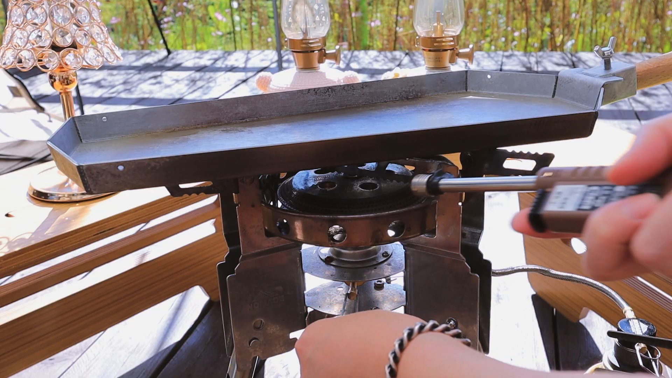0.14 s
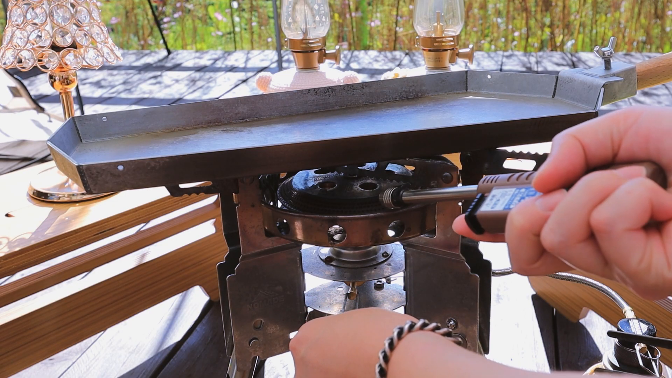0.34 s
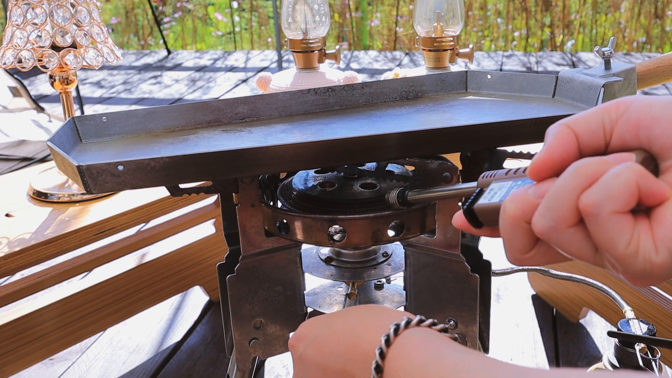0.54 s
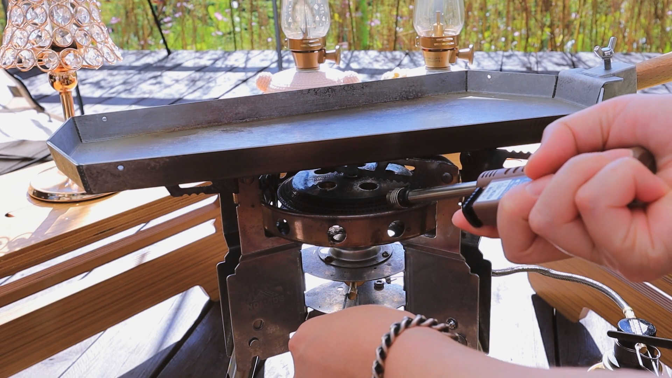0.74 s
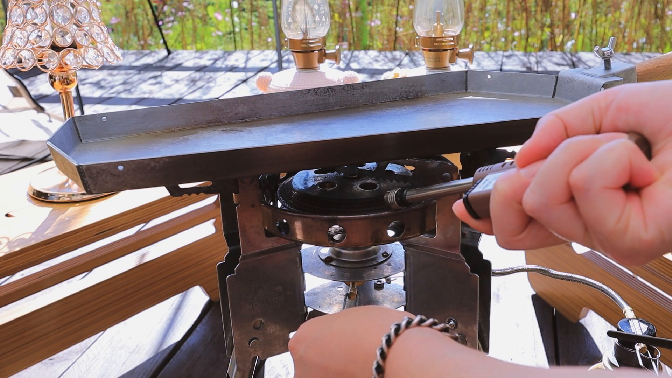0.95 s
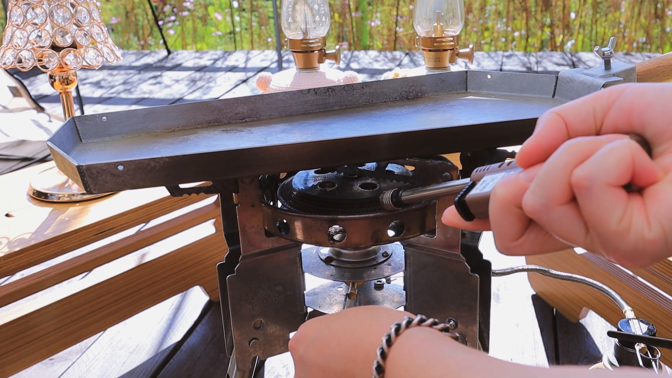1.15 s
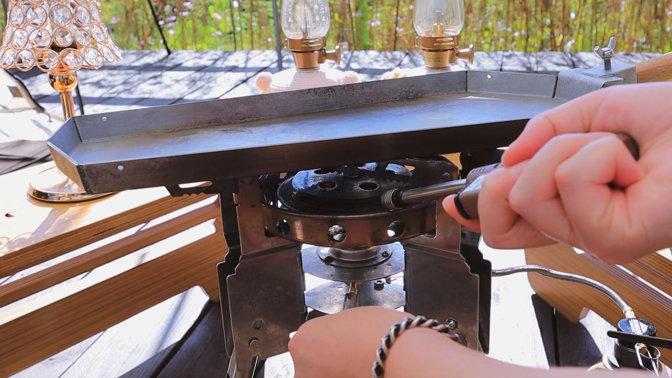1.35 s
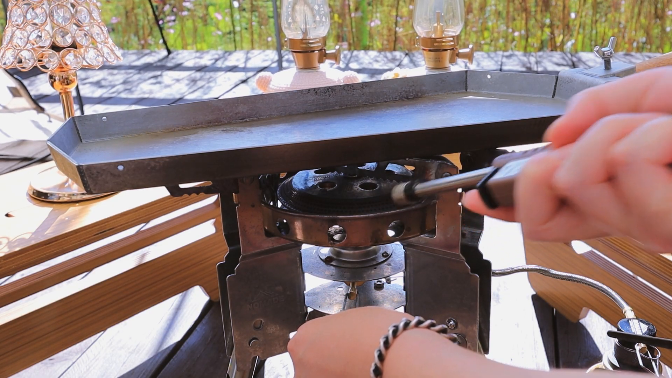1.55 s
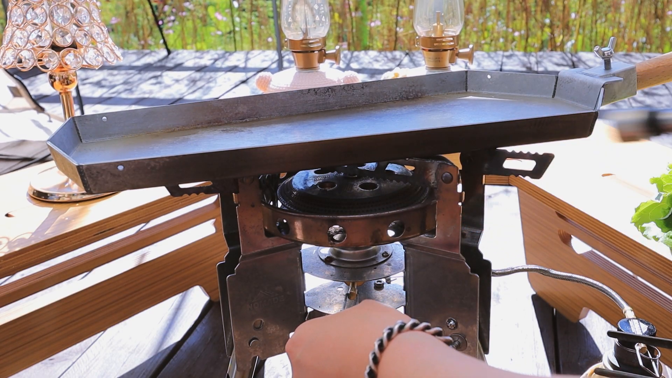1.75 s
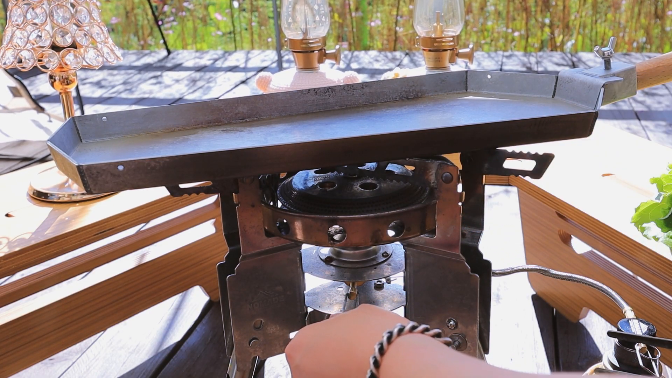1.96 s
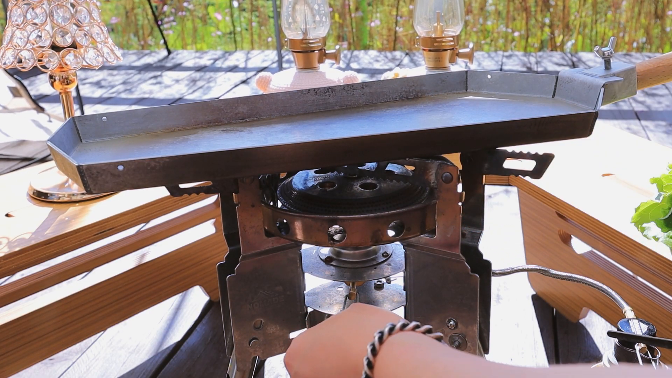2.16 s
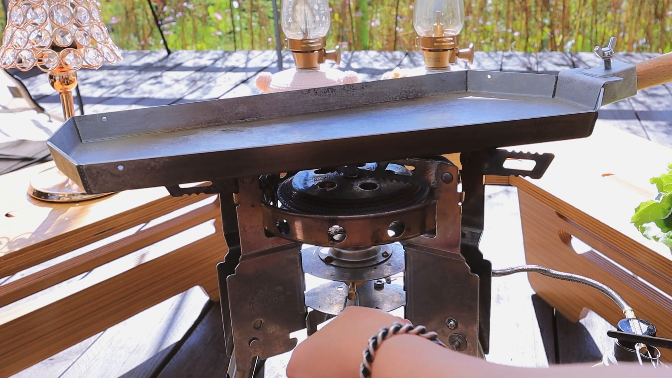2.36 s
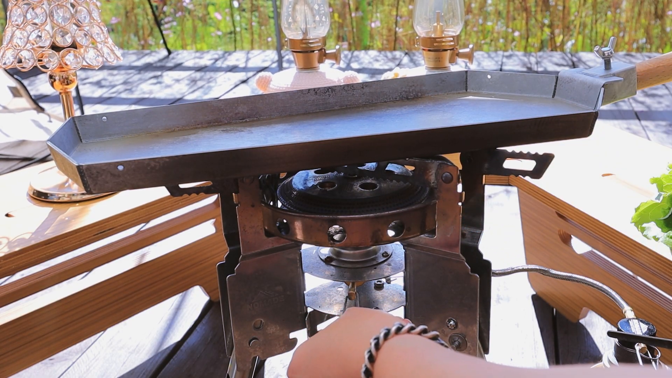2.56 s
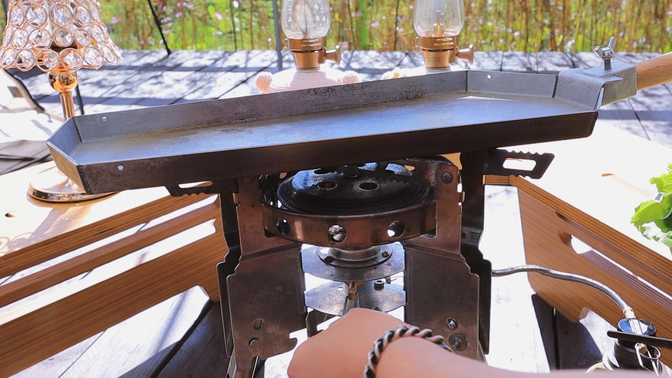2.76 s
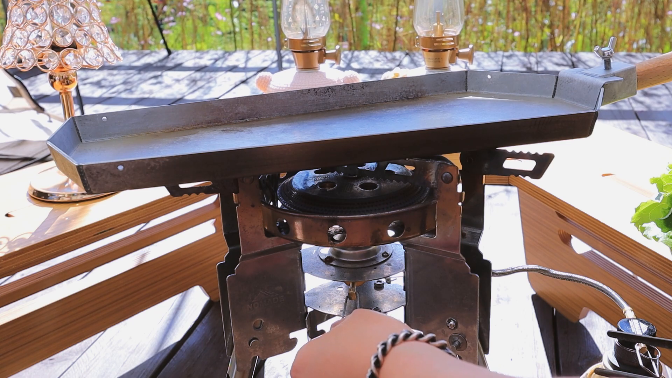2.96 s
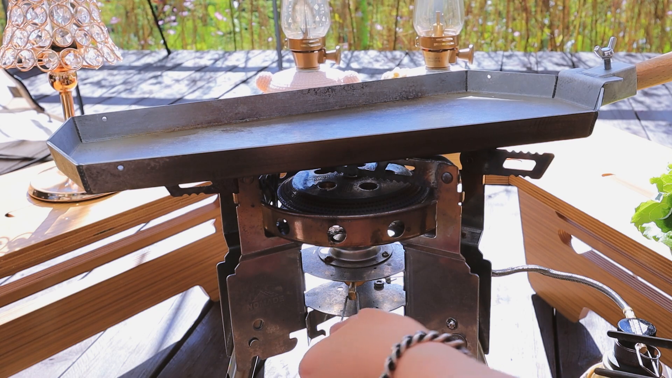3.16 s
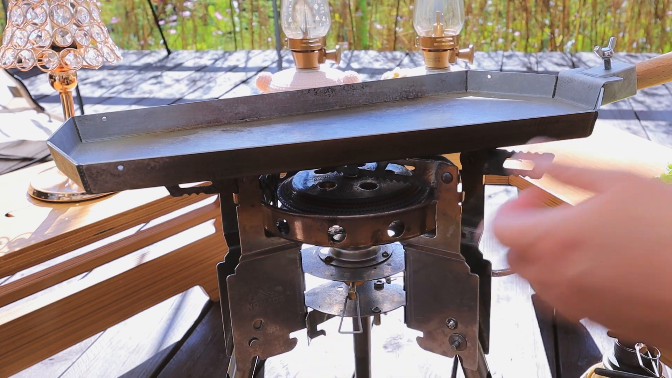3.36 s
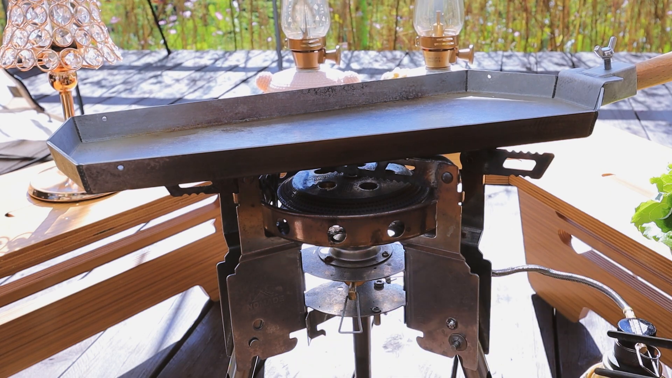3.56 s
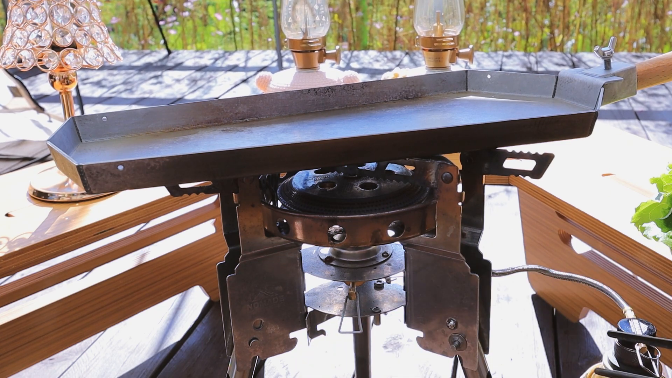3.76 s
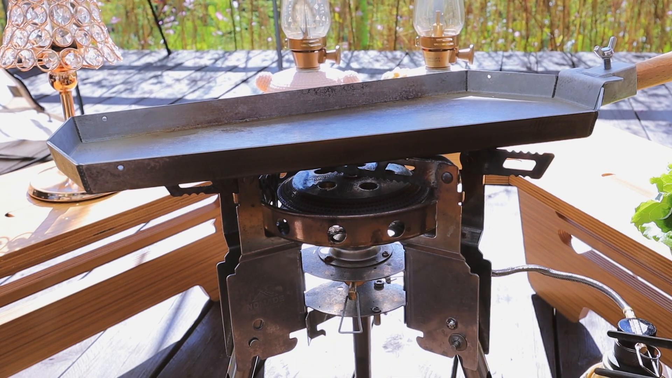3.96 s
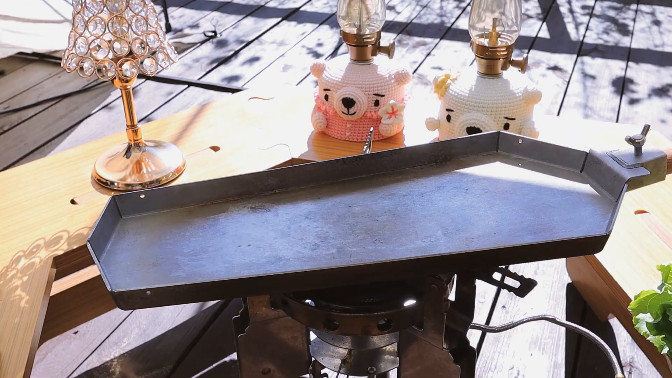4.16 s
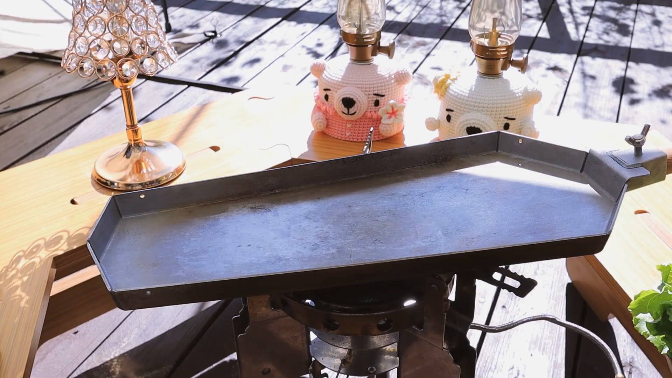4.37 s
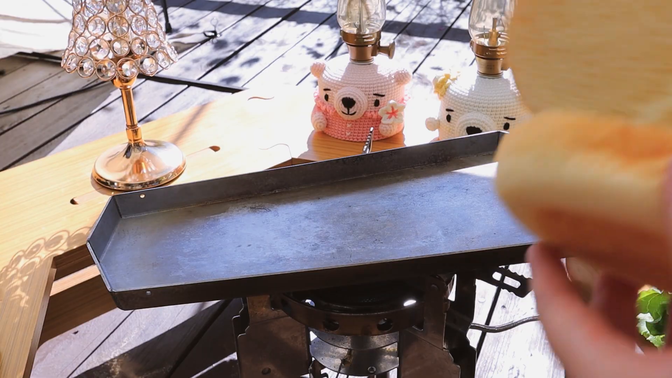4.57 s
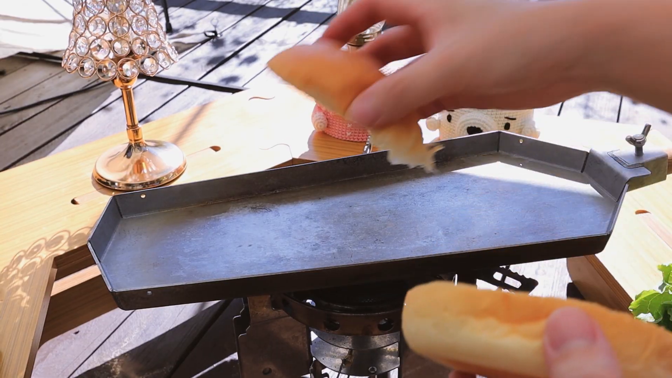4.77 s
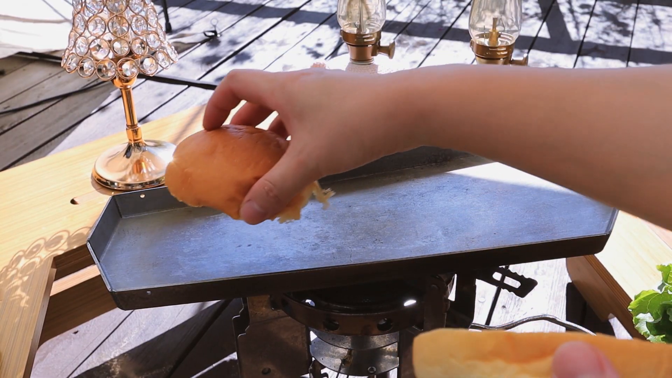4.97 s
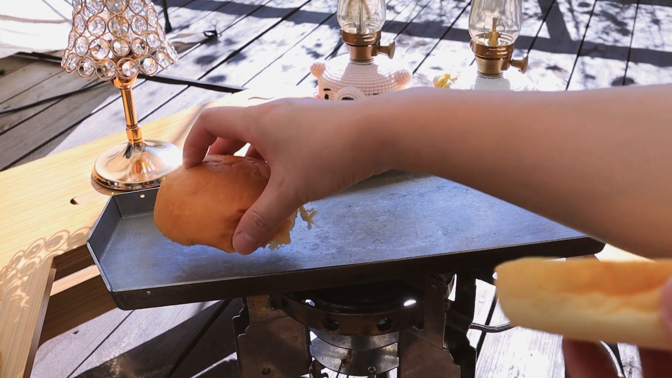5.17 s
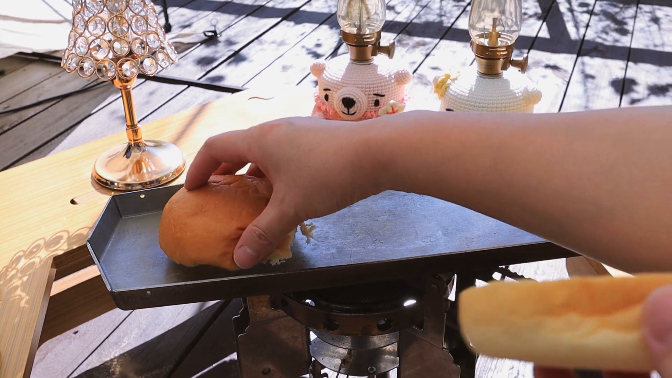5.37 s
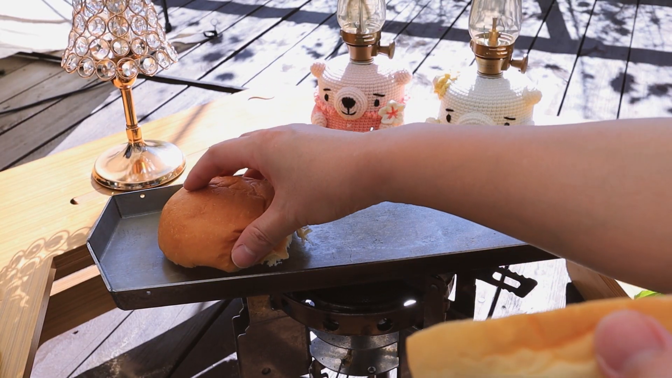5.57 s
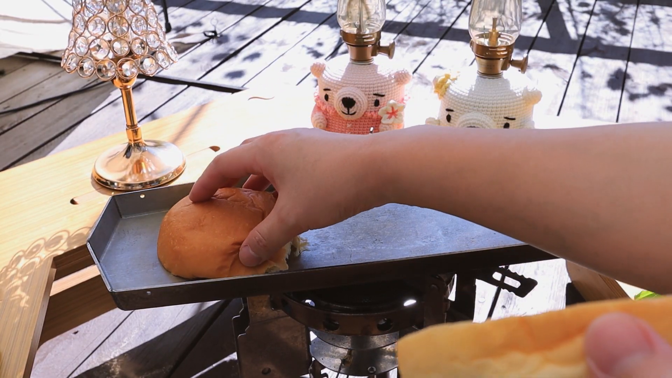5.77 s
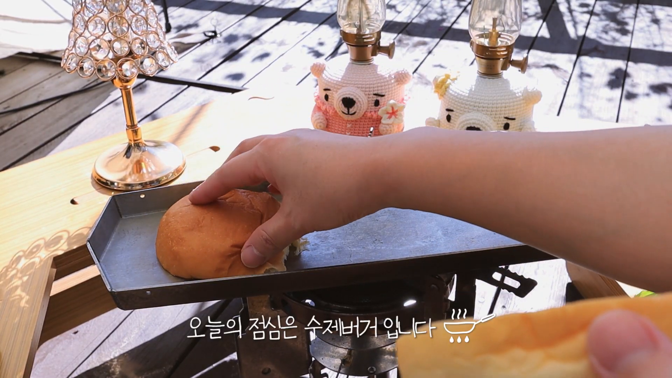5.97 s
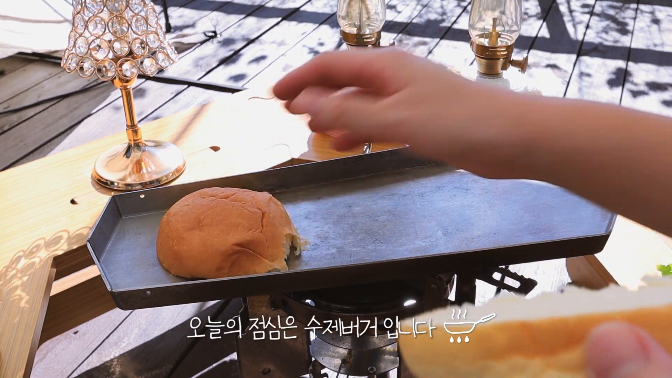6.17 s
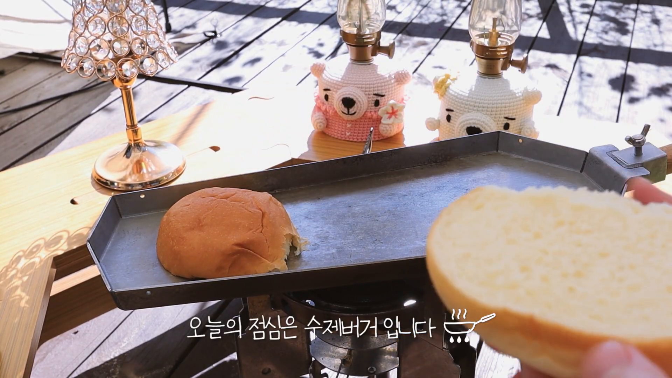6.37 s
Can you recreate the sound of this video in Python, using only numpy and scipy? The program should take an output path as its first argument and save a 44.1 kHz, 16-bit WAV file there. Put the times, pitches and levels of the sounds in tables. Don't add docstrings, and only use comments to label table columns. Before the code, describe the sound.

Outdoors, close to a small gas burner, thin gas hiss and steady high cicadas. A lighter clinks on the steel griddle, then its trigger snaps hard twice, each followed by a softer release. The gas catches with a low thump, and the flame is turned up to a hissing roar. Abruptly the view is above the griddle: quieter, dull rumbling, with a dry bun crust crackling very close.

```python
import sys
import numpy as np
from scipy import signal
from scipy.io import wavfile

SR = 44100
rng = np.random.default_rng(int(sys.argv[2]) if len(sys.argv) > 2 else 0)


def dump(signal):
    limited = np.clip(np.atleast_2d(signal).T, -1, 1)
    pcm = np.round(limited * 32767).astype(np.int16)
    wavfile.write(sys.argv[1], SR, pcm)


def boost_factor(decibels):
    exponent = np.asarray(decibels, float) / 20
    return 10 ** exponent


N = 282917
TIME = np.arange(N) / SR

CHANGE_S = 4.205
CATCH_S = 1.445
WARM_UP_S, FLARE_S = 0.16, 0.11
FLAME_ABOVE_DB, WHISTLE_ABOVE_DB, CICADA_DB = -39, -65, -43
AIR_DB, AIR_ABOVE_DB = -51.5, -58.5

# time_s, opening_0_to_1
VALVE = [
    (0.0, 0.01),
    (2.15, 0.05),
    (2.5, 1.0),
    (3.1, 0.82),
    (4.2, 0.64),
]
# pitch_hz, width_hz,
# level_db
TUBE = [(1116, 114, -6), (1556, 166, 4), (1825, 74, 2.5), (2197, 320, 0.5), (2790, 190, -5),
        (3047, 97, -2.5), (3460, 320, -8)]
WHISTLE = [(3962, 142, 5), (4170, 300, -24)]
NOZZLE = [(5330, 205, 6.5), (6390, 300, 7.5), (6860, 140, 1), (7530, 210, 9.5), (11130, 260, -1),
          (11500, 200, -8)]
HIGH_BAND = [(13300, 540, -2), (13750, 180, 3), (14600, 1500, -15)]
# cold_level_db, warm_gain_db, full_valve_gain_db
TUBE_LAW = (-50, -1.5, 9.04)
WHISTLE_LAW = (-59.5, 10.4, 3.1)
NOZZLE_LAW = (-52, 1.1, 5.6)
HIGH_BAND_LAW = (-58, -1.5, 5.5)
# middle_s, half_length_s, gain_db
SWELLS = [
    (1.76, .13, 5),
    (2.55, .1, 3),
    (3.4, .15, 4),
    (3.9, .08, 7),
]

# pitch_hz, density_db (per Hz)
AIR = [(25, 4), (55, -23), (88, 3), (130, -11.5), (220, 2), (500, -0.5), (1000, -8), (4800, -10),
       (10000, -12.5), (12000, -20), (15500, -18)]
AIR_ABOVE = [(1500, 2), (2700, -8.5), (4500, 9.5), (5500, -15), (10000, -16), (12500, -8), (15500, 4)]
# start_pitch_hz, change_pitch_hz, start_level_db, change_level_db
HUMS = [
    (402, 402, -60, -62),
    (697, 710, -68, -53.5),
]
# pitch_hz, width_hz, level_db
TYMBALS = [(7346, 680, -5), (8150, 840, 0), (8680, 615, 1), (9360, 2330, -15), (7100, 2100, -13.5)]

# start_s, peak_db, rattle_ms, echo_db
TAP = [
    (0.3727, -13, 8.0, -5),
]
SNAPS = [
    (0.9250, 11.5, 1.16, -16.5),
    (1.4025, 8.5, 1.4, -14.5),
]
RELEASES = [
    (1.1633, -16, 2.7, -16),
    (1.6497, -9.5, 2.1, -9),
]
# pitch_hz, width_hz, level_db
TAP_BODY = [(276, 200, 7.5), (1150, 810, 0), (1960, 710, 5.5), (3300, 2700, 2), (5400, 2400, 5),
            (7860, 2200, 3), (12100, 4800, -5), (16000, 1600, -9)]
SNAP_BODIES = [
    [(1260, 570, -2.5), (2440, 330, -5.5), (3330, 550, -1.5), (5020, 1130, -1), (6880, 1020, -1),
     (8720, 1130, 3), (10300, 1100, -12), (12250, 800, -4), (14250, 870, -4.5)],
    [(1150, 1300, -1.5), (2410, 750, 6), (3540, 820, -2), (4800, 950, 2), (6530, 940, 6), (7440, 1800, 3),
     (9200, 2300, 1), (10840, 780, -2.5), (13300, 4100, -6)],
]
RELEASE_BODY = [(1340, 520, -3), (2430, 580, 3), (3450, 480, 0.5), (4460, 500, -6.5), (5560, 810, -8),
                (7770, 1200, -6.5), (10000, 1500, -14), (12200, 1500, -16), (15000, 1100, -16)]
# pitch_hz, level_db, t60_s
GRIDDLE = [(305, -11.5, 0.33), (834, -18, 0.41), (1290, -7, 0.24), (3380, -4, 0.49), (4150, -2, 0.12),
           (4600, -8, .2), (5000, -2, 0.19), (5680, 4, 0.08), (6350, 6, 0.089), (7800, -1, 0.17),
           (8597, 6, 0.078), (10500, -1, 0.11), (11400, 1, .08), (14730, -10, .12)]
LATE_DB, LATE_STRETCH, TREBLE_LOSS_HZ = -8.5, 2.74, 14300
TRIGGER_CUT_HZ, TRIGGER_BASS_DB = 930, -15.5

# time_s, peak_db, pitch_hz, sign (positive: push first)
POPS = [
    (1.4475, -5, 116, 1),
    (1.4569, -10.5, 173, -1),
    (1.466, -20, 189, -0.68),
    (1.477, -22, 70, -1),
    (1.856, -27, 189, 1),
    (2.226, -29.5, 91, 0.88),
]
# pitch_hz, width_hz, level_db
FRONT_BODY = [(247, 110, 1.5), (453, 230, 1), (770, 320, -3.5), (1620, 180, -1), (2900, 1600, -19.5)]
FRONT_DB, FRONT_RISE_DB_PER_MS, FRONT_FALL_DB_PER_MS = -19.5, 2, 0.55
FRONT_S, FRONT_RAGGED_DB = 0.053, 3.5

# pitch_hz, density_db (per Hz)
RUMBLE = [(20, -37), (30, -20.5), (92, -7), (183, -1.5), (251, -3.5), (320, -22), (400, -30)]
UPPER_ROAR = [(250, -3), (310, -5), (402, 1.5), (650, -8), (900, -9.5), (1300, -42), (1700, -42)]
ROAR_ABOVE = [(15, -55), (25, -25), (80, -7.5), (197, -3), (294, -10.5), (475, 2), (709, -6.5), (939, -7.5),
              (1100, -18.5), (1270, -18.5), (1580, -12.5), (2090, -18), (2270, -29), (3000, -23),
              (3900, -62), (6600, -120)]
# low_valve_level_db, flare_gain_db, full_valve_gain_db
RUMBLE_LAW = (-47, 2.5, 4.5)
ROAR_LAW = (-56, 7.9, 9.2)

# middle_s, half_length_s, rate_grains_per_s
SQUEEZES = [
    (4.443, .12, 88),
    (5.016, .3, 650),
    (6.284, 0.092, 99),
]
CRUMBS_AT_REST_PER_S = 27
# start_s, peak_db, pitch_hz
CRUST_DULL = [(4.358, -33, 3870), (4.4308, -34, 3900), (4.4723, -27, 4800), (4.5248, -26, 4670),
              (4.6229, -36, 4020), (4.6838, -36.5, 4090), (4.7052, -34, 3190), (4.801, -30, 5030),
              (4.9406, -26, 3500), (4.9818, -24.5, 3300), (5.0255, -32, 4580), (5.0424, -24.5, 2940),
              (5.091, -25, 4230), (5.1517, -26, 4900), (5.1911, -25.5, 3330), (5.2117, -33, 3360),
              (5.2906, -33, 3180), (5.301, -29, 2950), (6.2774, -35, 3930)]
# start_s, peak_db, pitch_hz
CRUST_CLEAN = [
    (4.8344, -23.5, 4050),
    (4.8938, -27, 5010),
    (4.9631, -28, 4700),
    (5.2455, -20.5, 2600),
    (5.4071, -27.5, 2830),
]
DULL_EDGE_DB, CLEAN_EDGE_DB = -22, -10


def rms_one(x):
    return x / np.sqrt(np.mean(x ** 2) + 1e-20)


def valve_opening():
    s, opening = np.transpose(VALVE)
    return np.interp(TIME, s, opening)


def since_catch(time_s):
    return np.exp(-np.maximum(TIME - CATCH_S, 0) / time_s)


def drift(rate_hz):
    r = np.exp(-80 * np.pi * rate_hz / SR)
    white = rng.standard_normal(N // 40 + 2002)
    slow = signal.lfilter([1], [1, -2 * r, r * r], white)[2000:]
    return np.interp(np.arange(N) / 40, np.arange(len(slow)), rms_one(slow))


def resonate(x, hz, width_hz):
    r = np.exp(-np.pi * width_hz / SR)
    poles = [1, -2 * r * np.cos(2 * np.pi * hz / SR), r * r]
    return signal.lfilter([(1 - r * r) / 2, 0, (r * r - 1) / 2], poles, x)


def body(x, peaks):
    out = 0
    for k, (hz, width_hz, db) in enumerate(peaks):
        each_hz = 1.59 * width_hz
        out = out + (-1) ** k * boost_factor(db) * resonate(resonate(x, hz, each_hz), hz, each_hz)
    return out


def banded_noise(spectrum, patchy_db):
    hz, db = np.transpose(spectrum)
    octaves = np.log2(min(hz[-1], .45 * SR) / hz[0])
    edges = hz[0] * 2 ** np.arange(0, octaves + .1, 1 / 3)
    out, together, white = 0, drift(8.9), rng.standard_normal((2, N))
    for k, (low, high) in enumerate(zip(edges, edges[1:])):
        bandpass = signal.butter(2, [low, high], "band", fs=SR, output="sos")
        band = signal.sosfilt(bandpass, white[k % 2])
        level_db = np.interp(np.log(low * high) / 2, np.log(hz), db)
        flicker_db = patchy_db * (0.44 * together + drift(37.0))
        out = out + boost_factor(level_db + flicker_db) * band
    return rms_one(out)


def place(x, s):
    out, at = np.zeros(N), round(s * SR)
    out[at:at + len(x)] = x
    return out


def gas_jet():
    out, valve, warmth = 0, valve_opening(), 1 - since_catch(WARM_UP_S)
    surge_db = sum(db * np.exp(-((TIME - s) / half_s) ** 2) for s, half_s, db in SWELLS)
    parts = ((TUBE_LAW, TUBE, 1.1, 0), (WHISTLE_LAW, WHISTLE, 1.4, 0),
             (NOZZLE_LAW, NOZZLE, 1.6, 0), (HIGH_BAND_LAW, HIGH_BAND, 1.2, surge_db))
    for (cold_db, warm_db, valve_db), peaks, patchy_db, extra_db in parts:
        turbulence, rings = rng.standard_normal(N), 0
        for k, peak in enumerate(peaks):
            rings = rings + (-1) ** k * boost_factor(patchy_db * drift(3.0)) * body(turbulence, [peak])
        out = out + boost_factor(cold_db + warm_db * warmth + valve_db * valve + extra_db) * rms_one(rings)
    return out


def open_air(level_db, spectrum, patchy_db):
    return boost_factor(level_db) * banded_noise(spectrum, patchy_db)


def hums():
    out, way = 0, np.clip(TIME / CHANGE_S, 0, 1)
    for hz0, hz1, db0, db1 in HUMS:
        level_db = db0 + (db1 - db0) * way + 1.1 * drift(1.6)
        pitch_hz = hz0 + (hz1 - hz0) * way + 0.5 * drift(1.83)
        out = out + np.sqrt(2) * boost_factor(level_db) * np.sin(2 * np.pi * np.cumsum(pitch_hz) / SR)
    return out


def cicadas():
    sizes = boost_factor(0.94 * np.minimum(rng.exponential(1, N), 4)) * rng.choice([-1, 1], N)
    clicks = sizes * (rng.random(N) < 9000 / SR)
    return boost_factor(CICADA_DB + 0.19 * drift(6.6)) * rms_one(body(clicks, TYMBALS))


def knock(event, peaks, echo_t60_s, first=3.0, swell_ms=.01):
    s, db, rattle_ms, echo_db = event
    age = np.arange(SR // 4) / SR
    rattle = rng.standard_normal(len(age)) * np.exp(-(age * 1000 / rattle_ms) ** 3)
    rattle[0] = first
    wash, rung = rng.standard_normal(len(age)) * boost_factor(echo_db), 0
    for k, (hz, width_hz, level_db) in enumerate(peaks):
        fall_db = 60 * age / echo_t60_s * (1 + (hz / TREBLE_LOSS_HZ) ** 2)
        contacts = rattle + wash * (boost_factor(-fall_db) + boost_factor(LATE_DB - fall_db / LATE_STRETCH))
        mode = rms_one(body(contacts, [(hz, width_hz, 0)]))
        rung = rung + (-1) ** k * boost_factor(level_db) * np.sqrt(width_hz) * mode
    rung *= 1 - 0.38 * np.exp(-age * 1000 / swell_ms)
    return place(boost_factor(db) * rung / np.abs(rung).max(), s)


def griddle():
    out, (s, db, rattle_ms, _), age = 0, TAP[0], np.arange(SR // 2) / SR
    for hz, level_db, t60_s in GRIDDLE:
        touches = (age < rattle_ms / 1000) * rng.standard_normal(len(age))
        r, w = boost_factor(-60 / (t60_s * SR)), 2 * np.pi * hz / SR
        rung = signal.lfilter([0, np.sin(w)], [1, -2 * r * np.cos(w), r * r], touches + 1e-18)
        out = out + boost_factor(db - 15.5 + level_db) * rung / np.abs(rung).max()
    return place(out, s)


def wand_tap():
    return knock(TAP[0], TAP_BODY, 0.14, first=1.3, swell_ms=2.7) + griddle()


def trigger():
    snaps = sum(knock(event, peaks, 0.052, first=8.7) for event, peaks in zip(SNAPS, SNAP_BODIES))
    releases = sum(knock(event, RELEASE_BODY, 0.026, first=14.0) for event in RELEASES)
    highpass = signal.butter(3, TRIGGER_CUT_HZ, "high", fs=SR, output="sos")
    return signal.sosfilt(highpass, snaps + releases) + boost_factor(TRIGGER_BASS_DB) * snaps


def catch():
    lead = SR // 50
    ms = np.arange(-lead, SR // 10) * 1000 / SR
    gate = np.clip((FRONT_S - ms / 1000) / 0.0089, 0, 1)
    slope_db = np.minimum(FRONT_RISE_DB_PER_MS * ms, -FRONT_FALL_DB_PER_MS * ms)
    level_db = FRONT_DB + slope_db + FRONT_RAGGED_DB * drift(120)[:len(ms)]
    front = rms_one(body(rng.standard_normal(len(ms)), FRONT_BODY))
    out = place(gate * boost_factor(level_db) * front, CATCH_S - lead / SR)
    for s, db, hz, sign in POPS:
        age = TIME - s
        out -= sign * boost_factor(db) * np.exp(-(age * hz / 0.26) ** 2) * np.sin(2 * np.pi * hz * age)
    return out


def flame(level_db, spectrum, patchy_db):
    return boost_factor(level_db) * banded_noise(spectrum, patchy_db)


def burner_flame():
    lit = np.clip((TIME - CATCH_S - .025) / 0.017, 0, 1)
    out, valve, flare = 0, valve_opening(), since_catch(FLARE_S)
    for law, spectrum, patchy_db in ((RUMBLE_LAW, RUMBLE, 1.7), (ROAR_LAW, UPPER_ROAR, 1.33)):
        low_db, flare_db, valve_db = law
        out = out + flame(low_db + flare_db * flare + valve_db * valve, spectrum, patchy_db)
    return lit * out


def whistle_above():
    return boost_factor(WHISTLE_ABOVE_DB) * rms_one(body(rng.standard_normal(N), [(3810, 99, 0)]))


def crumble():
    per_s = CRUMBS_AT_REST_PER_S
    for s, half_s, top_per_s in SQUEEZES:
        per_s = per_s + top_per_s * np.exp(-((TIME - s) / half_s) ** 2)
    sizes = boost_factor(4.9 * np.minimum(rng.exponential(1, N), 2.5) - 36.0) * rng.choice([-1, 1], N)
    born, dealt = rng.random(N) < per_s / SR, rng.integers(0, 6, N)
    return sum(resonate(sizes * born * (dealt == k) + 1e-18, hz, 0.37 * hz) * 9000 / hz
               for k, hz in enumerate(np.geomspace(1100, 5800, 6)))


def crust(breaks_at, edge_db):
    out, size = np.zeros(N), 400
    age = np.arange(size) / SR
    for s, db, hz in breaks_at:
        afterbreaks = .12 * rng.standard_normal(size) * np.exp(-age / .0018)
        breaks = afterbreaks - (age == 0)
        tick = body(breaks, [(hz, .55 * hz, 0), (.45 * hz, .35 * hz, -4)])
        edge = body(rng.standard_normal(size) * np.exp(-age / .0003), [(11500, 4000, 0)])
        at = round((s + 0.00047) * SR)
        both = tick / np.abs(tick).max() + boost_factor(edge_db) * edge / np.abs(edge).max()
        out[at:at + size] += boost_factor(db + 1.5) * both
    return out


def scene():
    above = np.clip((TIME - CHANGE_S) / 0.012, 0, 1)
    beside = gas_jet() + open_air(AIR_DB, AIR, 1.0) + hums() + burner_flame()
    bun = crumble() + crust(CRUST_DULL, DULL_EDGE_DB) + crust(CRUST_CLEAN, CLEAN_EDGE_DB)
    over = flame(FLAME_ABOVE_DB, ROAR_ABOVE, 2.2) + open_air(AIR_ABOVE_DB, AIR_ABOVE, 0.52)
    over = over + whistle_above() + bun
    throughout = cicadas() + wand_tap() + trigger() + catch()
    return (beside * (1 - above) + over * above + throughout)[None]


def low_pass(x):
    return signal.sosfilt(signal.butter(12, 15740, fs=SR, output="sos"), x)


def record(dry):
    mix = np.clip(dry, -1, 1)
    return low_pass(mix)


dry = scene()
out = record(dry)
dump(out)
```